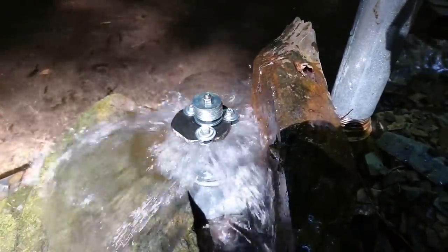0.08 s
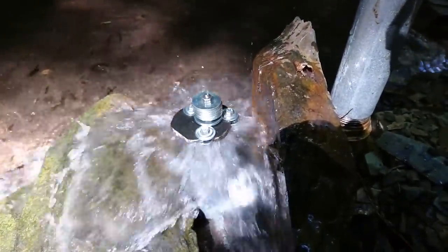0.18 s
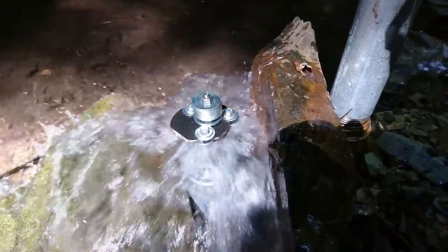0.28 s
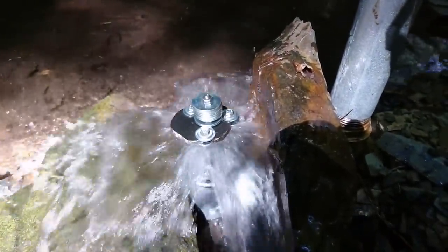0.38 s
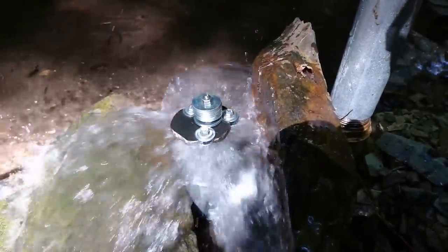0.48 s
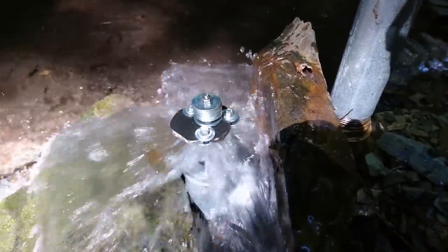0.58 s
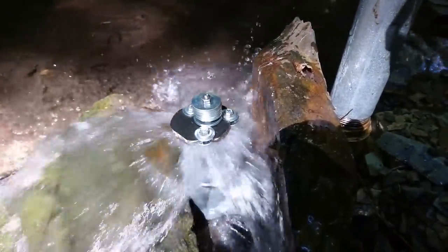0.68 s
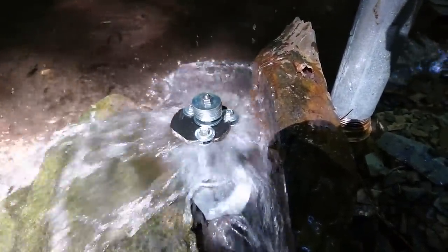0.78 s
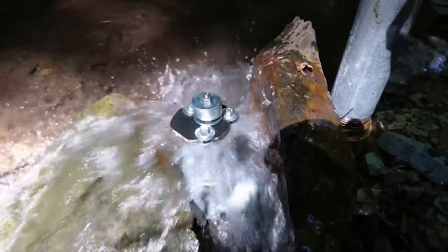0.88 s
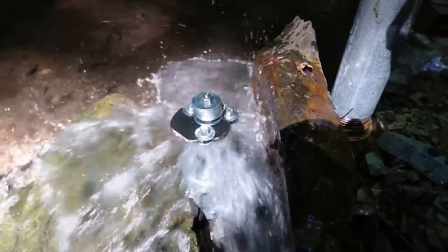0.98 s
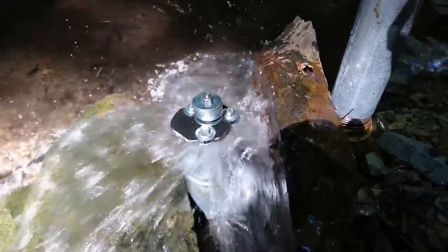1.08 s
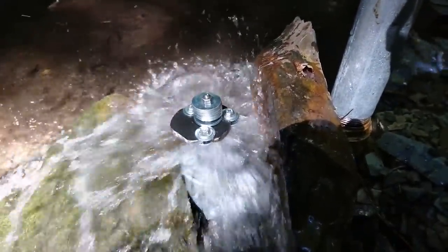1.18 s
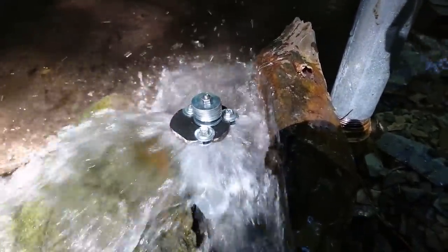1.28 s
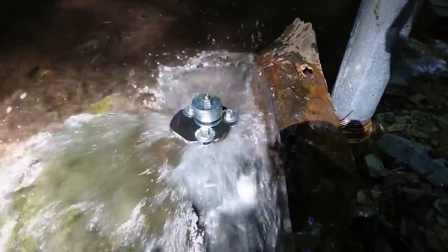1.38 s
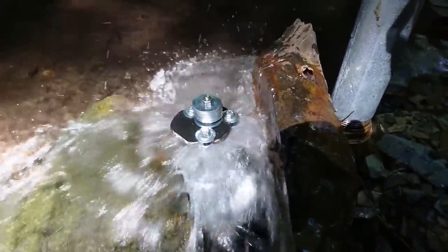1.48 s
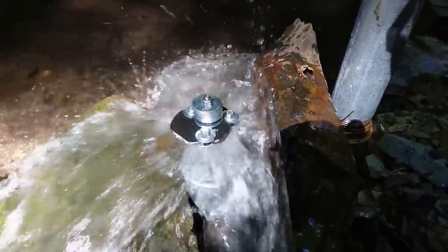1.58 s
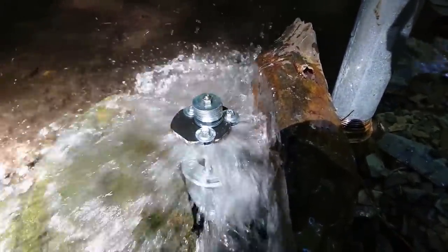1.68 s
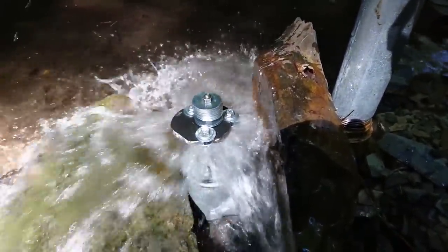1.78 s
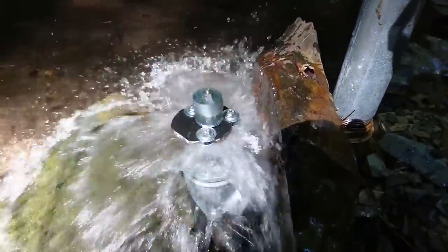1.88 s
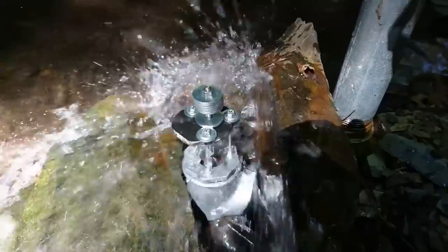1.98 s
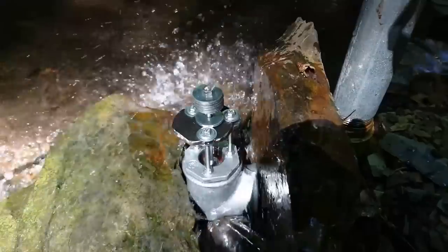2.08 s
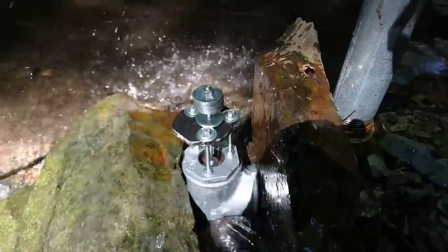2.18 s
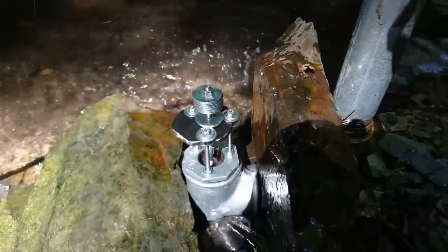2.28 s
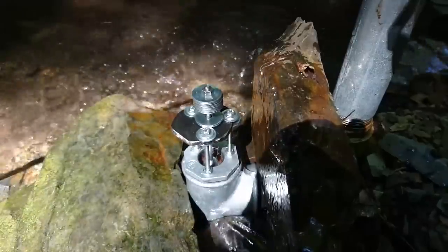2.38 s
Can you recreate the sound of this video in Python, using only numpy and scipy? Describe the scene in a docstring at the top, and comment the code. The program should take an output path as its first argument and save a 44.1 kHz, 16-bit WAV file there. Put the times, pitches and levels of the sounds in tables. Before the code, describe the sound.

Water gushes from a pump valve close by, spattering brightly on rocks with small bubbles and gurgles, and growing unevenly louder from the start. At about 2 seconds the valve slams shut with a sharp tick and one hollow metal knock. The remaining spray rains down until about 2.2 seconds, then only soft drips and a faint creek remain until about 2.5 seconds.

```python
"""A creek bank, with the microphone close to the waste valve of a ram pump. Water gushes out ever
harder and spatters on the rocks while bubbles ring and gurgle, until the flow drags the
valve shut: a tick, then a hollow knock and a thump as the water column slams into it.
The water still in the air rains down, then only drips and the creek remain."""
import sys
import numpy as np
from scipy import signal
from scipy.fft import rfft, irfft
from scipy.io import wavfile

SR = 44100
rng = np.random.default_rng(int(sys.argv[2]) if len(sys.argv) > 2 else 0)


def to_wav(s):
    """Save 16-bit WAV."""
    ch = np.atleast_2d(s).T  # columns
    pcm = np.round(np.clip(ch, -1, 1) * 32767)  # PCM
    wavfile.write(sys.argv[1], SR, pcm.astype(np.int16))


N = 108045
T = np.arange(N) / SR
HZ = np.maximum(np.fft.rfftfreq(N, 1 / SR), 1)


# Spray on the rocks: valve open, then the last water falling. Each row: seconds, relative level in dB.
GUSH = [(0, -44.5), (0.075, -48.5), (0.11, -44), (0.21, -39.5), (0.44, -39), (0.47, -36.5), (0.67, -37),
        (0.78, -33.5), (0.97, -35), (1.02, -35.5), (1.19, -31.0), (1.29, -35), (1.35, -34), (1.395, -37.5),
        (1.42, -31), (1.69, -33), (1.765, -34.5), (1.8, -31.5), (1.96, -30.5)]
FALLING = [(2.03, -37), (2.1, -38), (2.15, -33.5), (2.2, -38.5), (2.235, -47), (2.3, -55), (2.45, -61)]
SPRAY_DB, MIST_DB, CLUMP_DB, CLUMPS_PER_S = -3.1, -7, 1.4, 50

def gush():
    """Droplets and fine mist land on the rocks in clumps."""
    pitches = np.geomspace(650, 15000, 24)
    droplets = np.array([grains(pitches, per_s=5000, cycles=14, spread_db=3) for _ in range(2)])
    mist = from_db(MIST_DB) * stereo_white()
    clumps = rms_one(from_db(CLUMP_DB * drift(CLUMPS_PER_S)))
    return from_db(SPRAY_DB + in_time(GUSH + FALLING)) * clumps * (droplets + mist)


# Lumps of water on the rock by the pump. Each row: start in seconds, relative level in dB.
SPLATS = [(0.0927, -28.5), (0.1835, -31), (0.212, -31), (0.2525, -24.5), (0.392, -26.5), (0.408, -27),
          (0.4865, -26.5), (0.538, -27), (0.5659, -25), (0.692, -23), (0.7656, -23), (0.9316, -24),
          (0.9537, -21), (1.086, -22), (1.1262, -17), (1.209, -22.5), (1.2375, -20.5), (1.4078, -23),
          (1.424, -23), (1.5199, -23), (1.5755, -21.5), (1.633, -22), (1.663, -22), (1.696, -21),
          (1.7833, -21.5), (1.807, -22), (2.0655, -26), (2.3855, -45), (2.419, -46), (2.4315, -45)]
SPLAT_RISE_S, SPLAT_T60_S, SPLAT_DB, PING_DB = 0.002, 0.06, -9.5, -10

def splat_envelope():
    """Each lump slaps the rock in a short burst."""
    return sum(from_db(db + SPLAT_DB) * swell(s, SPLAT_RISE_S, SPLAT_T60_S) for s, db in SPLATS)


def splat_pings():
    """Each splat sets off a short, high ping near 4.3 kHz."""
    pitches = 4300 * np.exp(.13 * rng.standard_normal(len(SPLATS)))
    return sum(from_db(db + PING_DB) * tone(s, hz, SPLAT_RISE_S, t60=0.027, glide=2.5)
               for (s, db), hz in zip(SPLATS, pitches))


# The steel valve under the spatter. Each row: pitch in Hz, bandwidth in Hz, gain in dB.
VALVE_MODES = [(4290, 130, -1), (4490, 220, -5), (6200, 160, -7)]

def valve_ring(water):
    """The steel picks narrow tones out of the spatter."""
    ring = 0
    for hz, width, db in VALVE_MODES:
        radius = np.exp(-np.pi * width / SR)
        ring = ring + from_db(db) * (1 - radius ** 2) / 2 * resonate(water, hz, radius)
    return ring


def spatter():
    """The gush and the noise bursts of splats, splashes and the closing valve all ring the steel."""
    bursts = (splat_envelope() + splash_envelope() + closing_envelope()) * stereo_white()
    water = gush() + high_pass(bursts, hz=600)
    return spray_at_microphone(water + valve_ring(water))


# Valve and pipe, a little left of centre.
# Each row: start in seconds, pitch in Hz, level in dB, rise in seconds, time to fall 60 dB in seconds.
KNOCK_MODES = [(1.9728, 965, -27, 0.005, 0.03), (1.9845, 835, -21, 0.0044, 0.033),
               (1.982, 680, -28.5, 0.0031, 0.026), (1.983, 410, -30, 0.0015, 0.025),
               (1.9825, 1440, -29, .003, 0.073), (1.984, 1050, -33, 0.0017, 0.043),
               (1.984, 142, -33.5, 0.005, 0.037), (1.995, 186, -47, 0.012, 0.21)]
TICK_S, TICK_DB, SLAM_S, CRACK_DB = 1.9695, -18.5, 1.982, -24.5

def knock():
    """The shut valve stops the water column, and valve and pipe ring briefly."""
    ring = sum(from_db(db) * tone(s, hz, rise, t60) for s, hz, db, rise, t60 in KNOCK_MODES)
    return panned(ring, left_db=2)


def closing_envelope():
    """A tick as the valve meets its seat, then a crack as the water slams into it."""
    tick = from_db(TICK_DB) * swell(TICK_S, rise=.0003, t60=0.033)
    crack = from_db(CRACK_DB) * swell(SLAM_S, rise=.003, t60=0.15)
    return tick + crack


# The pump body from close by. Each row: frequency in Hz, relative noise density in dB.
BODY_SPECTRUM = [(50, -16), (130, -14), (280, -10), (500, -3), (850, -3), (1400, -1), (2500, -2.5),
                 (6000, -29)]

def body_rattle():
    """The slam shakes the pump body."""
    return from_db(-27) * swell(SLAM_S, rise=0.0025, t60=0.14) * noise(BODY_SPECTRUM)


# Larger bubbles and drips around the pump.
# Each row: start in seconds, pitch in Hz, level in dB, time to fall 60 dB in seconds.
BUBBLES = [(0.1208, 1760, -41.5, 0.035), (0.26, 1650, -30, 0.023), (0.3003, 1054, -40, 0.058),
           (0.3288, 1580, -35.5, 0.027), (0.418, 1370, -33.5, 0.014), (0.7174, 1420, -31, 0.013),
           (0.8035, 1880, -31.5, 0.03), (0.8873, 1190, -36, 0.021), (0.8932, 708, -35, 0.046),
           (1.0008, 970, -41.5, 0.053), (1.359, 1120, -38.5, 0.039), (1.4931, 1587, -31, 0.034),
           (1.6487, 1580, -31.5, 0.022), (1.8534, 1040, -36.5, 0.023), (1.8913, 1550, -31, 0.02),
           (2.1952, 1118, -35.5, 0.06), (2.3224, 2550, -44, 0.018), (2.3638, 5950, -38.5, 0.012)]
BUBBLE_RISE_S, BUBBLE_GLIDE_PER_S, SPLASH_DB = 0.00068, 2.5, -8

def large_bubbles():
    """Single bubbles ring and climb in pitch."""
    return sum(from_db(db) * tone(s, hz, BUBBLE_RISE_S, t60, BUBBLE_GLIDE_PER_S)
               for s, hz, db, t60 in BUBBLES)


def splash_envelope():
    """A small splash starts with each large bubble."""
    return sum(from_db(db + SPLASH_DB) * swell(s, BUBBLE_RISE_S, SPLAT_T60_S) for s, _, db, _ in BUBBLES)


# Small bubbles in the same water. Each row: start in seconds, pitch in Hz, level in dB.
CHIRPS = [(.273, 4170, -33), (.409, 2850, -30.5), (.659, 2850, -33), (.955, 4750, -27), (1.088, 3450, -30),
          (1.732, 2610, -29.5), (2.2655, 3900, -40)]

def chirping_bubbles():
    """Small bubbles chirp steeply upward as they reach the surface."""
    return sum(from_db(db) * tone(s, hz, BUBBLE_RISE_S, t60=.028, glide=13) for s, hz, db in CHIRPS)


GURGLE_DB, GURGLE_FOLLOWS, SHUT_DB = -53, 0.78, -6.5
SURGE_S, SURGE_WIDTH_S, SURGE_DB = 1.885, 0.033, 5

def gurgle():
    """A crowd of bubbles follows the flow, swells as the valve gap narrows and sinks once it shuts."""
    flow_db = in_time(GUSH + FALLING)
    level_db = GURGLE_DB + GURGLE_FOLLOWS * (flow_db - flow_db.mean()) + SHUT_DB * (T > SLAM_S)
    surge_db = SURGE_DB * np.exp(-((T - SURGE_S) / SURGE_WIDTH_S) ** 2)
    crowd = grains(np.geomspace(950, 2100, 12), per_s=300, cycles=20.5, spread_db=2)
    return from_db(level_db + surge_db) * crowd


# Drops right beside the microphone. Each row: start in seconds, relative level in dB.
CLOSE_DROPS = [(0.379, -28.5), (0.4225, -27), (0.551, -28), (0.659, -22.5), (1.0146, -24), (1.336, -26),
               (1.749, -25), (1.864, -21.5), (1.952, -22), (2.310, -42), (2.385, -41.5)]

def close_drops():
    """Single drops land with a short, bright tick."""
    ticks = sum(from_db(db) * swell(s, rise=.0003, t60=.017) for s, db in CLOSE_DROPS)
    return spray_at_microphone(high_pass(ticks * stereo_white(), hz=7500))


TRICKLES_PER_S, TRICKLE_DB, TRICKLE_SPREAD_DB, TRICKLE_T60_S = 110, -52.5, 4, .012

def trickle():
    """Water runs off the pump and the rocks in a scatter of soft drips."""
    lands = rng.random(N) < TRICKLES_PER_S / SR
    sizes = from_db(TRICKLE_DB + TRICKLE_SPREAD_DB * rng.standard_normal(N))
    decay = from_db(-60 / (TRICKLE_T60_S * SR))
    patter = signal.lfilter([1], [1, -decay], lands * sizes + 1e-18)
    return spray_at_microphone(patter * stereo_white())


# The pipe, low under the spatter. Each row: time in seconds, level in dB.
RUMBLE_LEVEL = [(0, -57.5), (.35, -55), (.53, -57), (.6, -63), (.72, -55.5), (.95, -65.5), (1.35, -63.5),
                (1.47, -57.5), (1.78, -56), (1.84, -61), (2.1, -64), (2.45, -84)]
# Its tone. Each row: frequency in Hz, relative noise density in dB.
RUMBLE_SPECTRUM = [(25, -44), (42, -34), (56, -9), (100, 3), (135, -7.5), (300, -17), (1000, -14.5),
                   (2000, -56)]

def pipe_rumble():
    """The flow rumbles unevenly in the pipe and fades after the slam."""
    return from_db(in_time(RUMBLE_LEVEL)) * noise(RUMBLE_SPECTRUM)


# The creek in the background. Each row: frequency in Hz, relative noise density in dB.
CREEK_SPECTRUM = [(30, -24), (70, 0), (220, -8), (480, -1.5), (900, -8), (4000, -13), (15000, -40)]

def creek():
    """Running water makes a faint, steady wash."""
    return from_db(-57) * noise(CREEK_SPECTRUM)


# The spray from the bank. Each row: frequency in Hz, relative density in dB on the left, on the right.
SPRAY_SPECTRUM = [(100, -34, -34), (238, -19.5, -24.5), (550, -19, -16), (780, -15, -24.5),
                  (1130, -16.5, -22), (1600, -10, -12), (2000, -15.5, -12.5), (2460, -7, -10.5),
                  (2740, -5.5, -5), (3060, -5.5, -11), (3666, 0, -4.5), (4310, -8, -8), (5270, -7.5, -3),
                  (6300, -8, -9.5), (7370, -12, -10), (8080, -23, -12.5), (10120, -11.5, -15.5),
                  (11600, -26, -23), (13600, -26.5, -21.5), (15100, -35, -35)]

def spray_at_microphone(pair):
    """The spray reaches each side with its own colour."""
    return spread(pair, at_hz(SPRAY_SPECTRUM, column=1), at_hz(SPRAY_SPECTRUM, column=2))


# Width at the microphone. Each row: frequency in Hz, likeness of left and right from 0 to 1.
LIKENESS = [(100, 0.96), (1200, 0.67), (1900, 0.84), (2400, 0.37), (3600, 0.51), (6300, 0.48), (8500, 0.22),
            (14000, 0.14)]
# Phase between its sides. Each row: frequency in Hz, lead of the left in radians.
LEFT_LEAD = [(0, -0.5), (780, 1.45), (1550, 1.13), (1980, 2.5), (2760, 1.37), (3880, 3), (5000, 9.0),
             (8790, 23), (15000, 45)]

def spread(pair, left_db, right_db):
    """Two unrelated sounds become a coloured, partly alike stereo pair."""
    first, second = rfft(pair)
    alike = at_hz(LIKENESS)
    mid, side = np.sqrt((1 + alike) / 2) * first, np.sqrt((1 - alike) / 2) * second
    lag = np.exp(-1j * np.interp(HZ, *np.transpose(LEFT_LEAD)))
    colour = rms_one(from_db([left_db, right_db]))
    return irfft(np.array([mid + side, (mid - side) * lag]) * colour, N)


def grains(pitches, per_s, cycles, spread_db, patch_db=2.2):
    """Random drops or bubbles ring and fall 60 dB within `cycles`; high ones come most often."""
    out = np.zeros(N)
    for hz in pitches:
        born = rng.random(N) < per_s * hz / pitches.sum() / SR
        sizes = from_db(spread_db * np.minimum(rng.exponential(1, N), 4.5)) * rng.choice([-1, 1], N)
        rung = resonate(born * sizes + 1e-18, hz, radius=from_db(-60 * hz / (cycles * SR)))
        out += np.sqrt(hz) * rms_one(rung * from_db(patch_db * drift(per_s=23)))
    return rms_one(out)


def swell(start, rise, t60):
    """An envelope of height one that rises quickly and dies away."""
    out, sounding = np.zeros(N), slice(int(start * SR), int((start + 2 * t60) * SR))
    age = np.maximum(T[sounding] - start, 0)
    out[sounding] = (1 - np.exp(-(age / rise) ** 2)) * from_db(-60 * age / t60)
    return out / (out.max() + 1e-12)


def tone(start, hz, rise, t60, glide=0):
    """A dying sine whose pitch climbs by the share `glide` per second."""
    age = T - start
    return swell(start, rise, t60) * np.sin(2 * np.pi * hz * age * (1 + glide * age / 2))


def resonate(x, hz, radius):
    """One resonance; a radius nearer one rings longer."""
    return signal.lfilter([1, 0, -1], [1, -2 * radius * np.cos(2 * np.pi * hz / SR), radius ** 2], x)


def drift(per_s):
    """Chance ups and downs around a given rate, with a spread of one."""
    band = (HZ / per_s) / (1 + (HZ / per_s) ** 2) ** 1.5
    return rms_one(irfft(rfft(rng.standard_normal(N)) * band, N))


def stereo_white():
    """Two unrelated white noises."""
    return rng.standard_normal((2, N))


def noise(spectrum):
    """Coloured stereo noise with an rms near one."""
    return spread(stereo_white(), at_hz(spectrum), at_hz(spectrum))


def panned(x, left_db):
    """Raise the left side and lower the right by left_db."""
    return np.array([x * from_db(left_db), x * from_db(-left_db)])


def high_pass(x, hz):
    """Take away the lows."""
    return signal.sosfilt(signal.butter(2, hz, "high", fs=SR, output="sos"), x)


def in_time(rows):
    """Join (seconds, value) points by straight lines."""
    return np.interp(T, *np.transpose(rows))


def at_hz(rows, column=1):
    """One column of a frequency table at every frequency."""
    rows = np.array(rows)
    return np.interp(np.log(HZ), np.log(rows[:, 0]), rows[:, column])


def from_db(db):
    """Decibels to gain."""
    return 10 ** (np.asarray(db) / 20)


def rms_one(x):
    """Scale to an rms of one."""
    return x / np.sqrt(np.mean(x ** 2) + 1e-20)


def scene():
    """The pump up close, bubbles and pings a little to the left, the creek behind."""
    water = spatter() + close_drops()
    ringing = panned(large_bubbles() + chirping_bubbles() + splat_pings() + gurgle(), left_db=2)
    return water + ringing + knock() + body_rattle() + pipe_rumble() + creek() + trickle()


def record(dry):
    """The treble is cut steeply above 15.2 kHz."""
    return signal.sosfilt(signal.ellip(10, .1, 80, 15200, fs=SR, output="sos"), dry)


dry = scene()
out = record(dry)
to_wav(out)
```